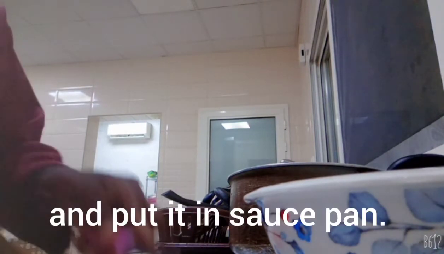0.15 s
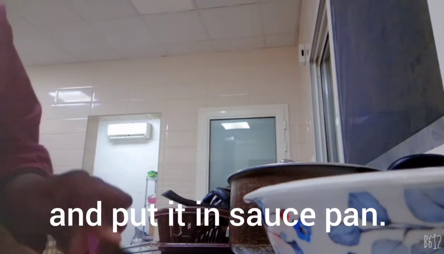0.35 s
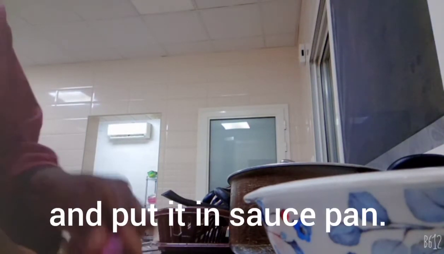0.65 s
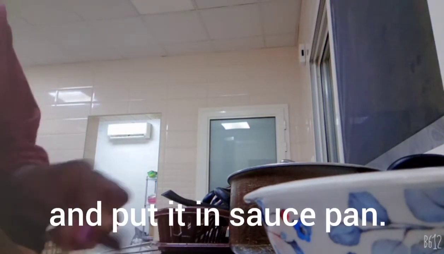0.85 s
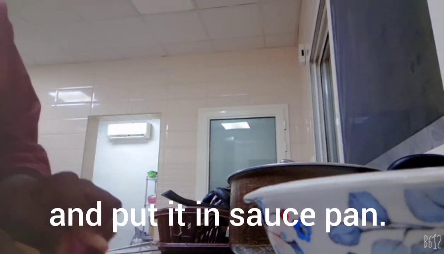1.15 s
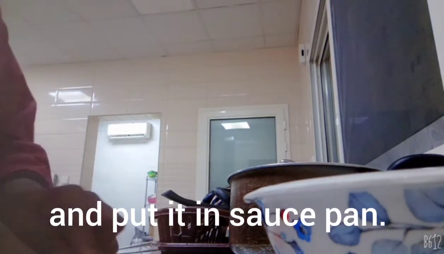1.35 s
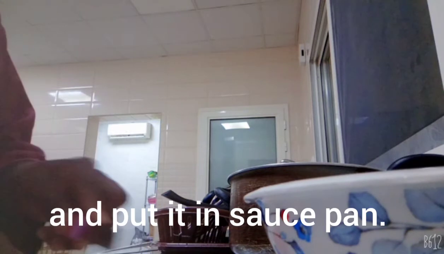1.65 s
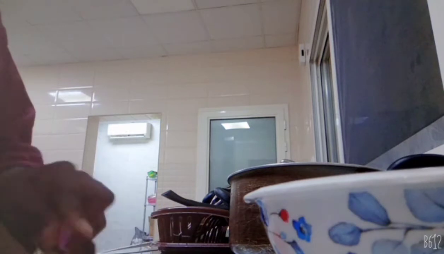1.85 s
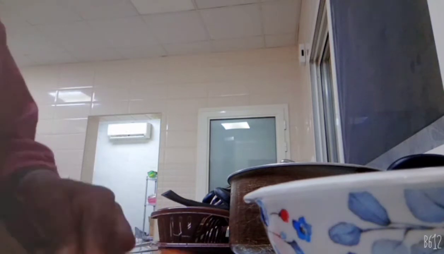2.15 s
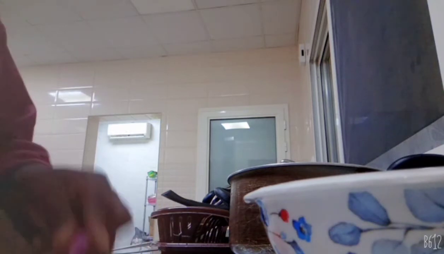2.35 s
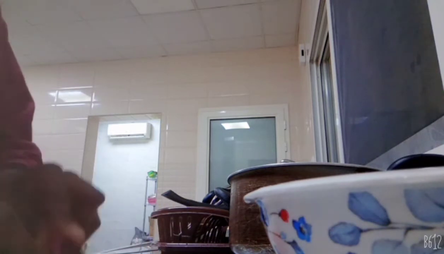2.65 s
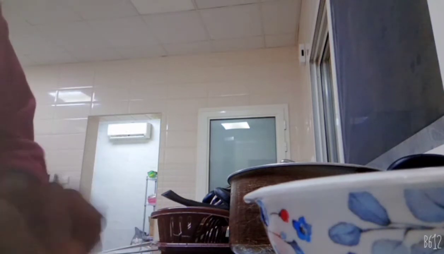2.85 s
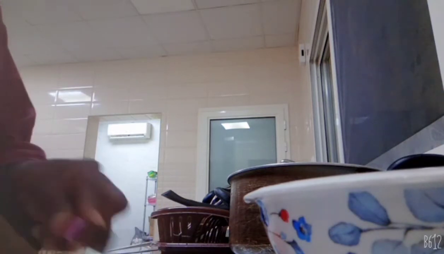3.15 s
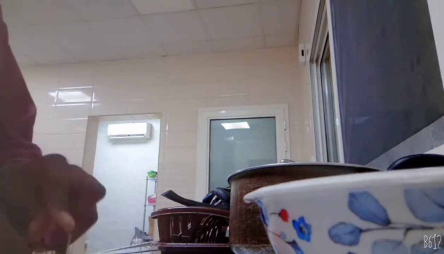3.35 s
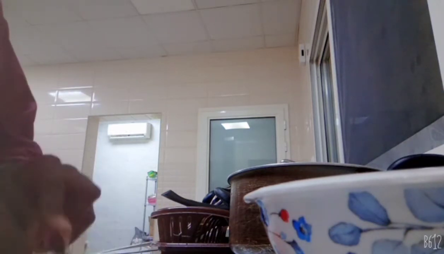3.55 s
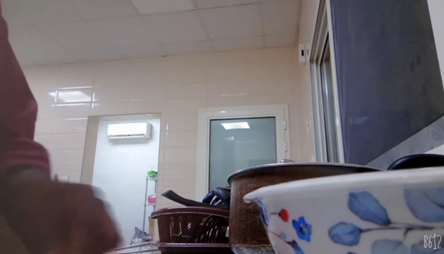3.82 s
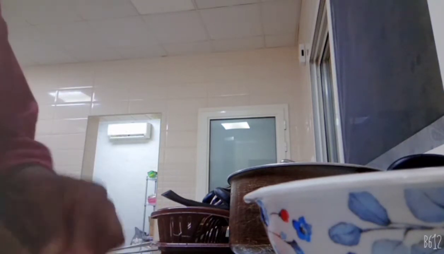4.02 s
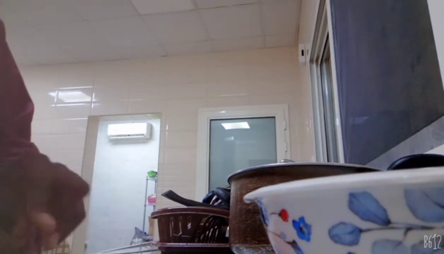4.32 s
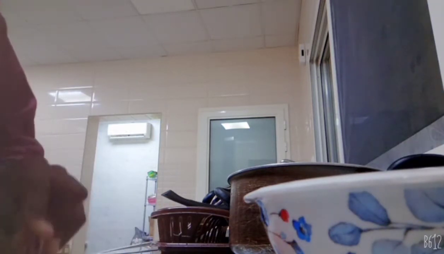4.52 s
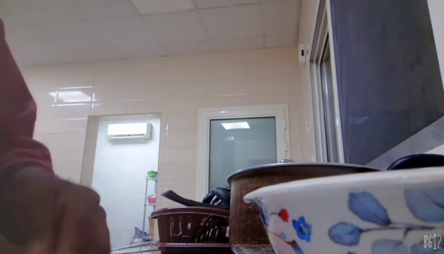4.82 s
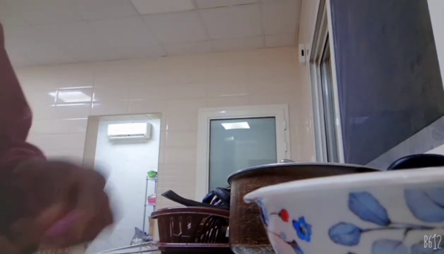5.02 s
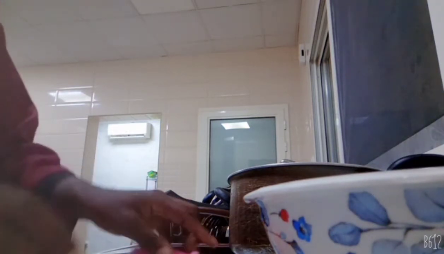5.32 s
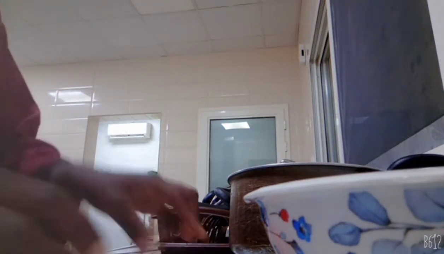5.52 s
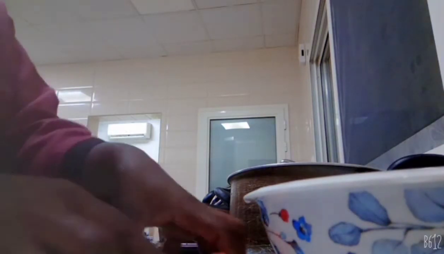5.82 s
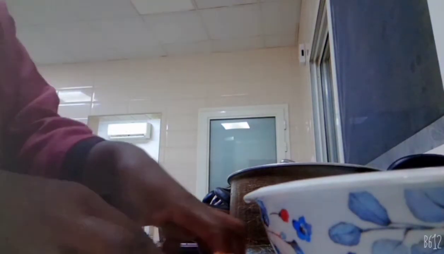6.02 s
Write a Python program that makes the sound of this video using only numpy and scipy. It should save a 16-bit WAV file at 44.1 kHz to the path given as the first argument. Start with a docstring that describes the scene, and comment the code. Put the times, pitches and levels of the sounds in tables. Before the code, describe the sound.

A serrated knife saws and crunches through a carrot six times, each cut ending in a sharp board knock, then the knife is laid down clattering.

```python
"""Slicing a carrot on a kitchen board

A serrated knife slices a carrot on a board, close to a phone that rests on the same counter of a tiled kitchen.
Teeth slip in the skin and fibres crackle, both as coloured noise bursts; the blade knocks the board, which rings
in decaying modes; slices tip over, the knife is laid down and hands rustle. The counter booms into the phone as
resonated noise, and the phone's suppressor pushes the steady room noise down."""
import sys
import numpy as np
from scipy import signal
from scipy.fft import rfft, irfft
from scipy.io import wavfile
from scipy.ndimage import uniform_filter1d

SR = 44100
rng = np.random.default_rng(int(sys.argv[2]) if len(sys.argv) > 2 else 0)


def volts(x):
    """Linear amplitude factor 10**(x/20) for a level x in dB, scalar or array-like."""
    e = np.asarray(x, float) / 20
    return 10 ** e


def transcribe(u):
    """Save the signal u as a 16-bit wav file named by the first command-line argument.

    u: samples, shape (n,) or (channels, n), limited to [-1, 1]; the rate is SR.
    q: integer samples, one column per channel.
    """
    v = np.clip(np.atleast_2d(u).T, -1, 1)
    q = np.round(v * 32767).astype(np.int16)
    wavfile.write(sys.argv[1], SR, q)


N = 272538  # samples

# blade breaking through and landing on the board; levels are relative within each part:
# landing_s, first_crackle_ms, crunch_ms, crunch_db, knock_db, contact_ms, last_fibres_db, thinness (-1 to 1)
CUTS = [(0.2049, 25, 8.7, -18, -15.5, 0.03, -38, 0.15), (1.112, 17, 5.76, -10.5, -12.5, 0.029, -24.5, 0.09),
        (1.8669, 7.3, 9.5, -14.5, -10, 0.021, -22, 0.19), (2.610, 23, 11, -16.5, -8.5, 0.068, -30.5, 0.069),
        (3.568, 6.9, 19, -17, -9.5, 0.14, -31, 0.22), (4.5028, 14, 4.6, -8, -6, 0.11, -30, 0.55)]
# modes of the cutting board: pitch_hz, relative_level_db, t60_s
BOARD = [(620, 3, 0.019), (1792, -8.5, 0.12), (2180, 6.5, 0.027), (2566, 24.5, 0.02), (2900, 20.5, 0.023),
         (4400, 16, 0.013), (5200, 3.5, 0.026)]
# modes of the knife: pitch_hz, relative_level_db, t60_s
KNIFE = [(634, -11.5, 0.1), (730, -10.5, 0.088), (1220, -2.5, 0.034), (1700, 5, 0.033), (1920, 0, 0.045),
         (3170, 11, 0.0064), (4700, 3, 0.01)]
# crisp colour of the root: frequency_hz, gain_db
FIBRE = [(300, -19.5), (600, -17), (1300, -28.5), (2700, -16.5), (3800, -14.5), (4800, -4.5), (6200, 3.5),
         (7400, -12.5), (9000, -24), (13000, -29.5), (14800, -9), (16200, -22.5)]
# what the walls get of a blow on the board: frequency_hz, gain_db
BLOW = [(150, -46), (550, -4), (1200, -16.5), (1900, -6), (2350, 3.5), (3150, 3.5), (3900, -6), (5200, 9),
        (7000, -8), (10000, -49)]
# what the walls get of a tap of the knife, also the dull colour of its dragging: frequency_hz, gain_db
RATTLE = [(300, -8.5), (600, -0.5), (1200, -2), (1900, -4.5), (2500, -8.5), (5000, -3), (9000, -39)]
# bright colour of the knife's scuffs and dragging: frequency_hz, gain_db
SCUFF = [(880, -34), (1500, -5.5), (2680, -9), (4890, -6), (6270, -1.5), (8220, -33), (15100, -45.5),
         (16400, -18.5)]
PRESS_RISE_DB_S, PRESS_FALL_DB_S, RUB_FALL_DB_S = 605, 253, 128.5
RUB_GRIT_DB = 2.6  # unevenness of rubbing noise


def unit(x):
    """Normalization: scales a signal to rms 1."""
    return x / np.sqrt(np.mean(x ** 2))


def colour(x, table):
    """Minimum-phase filtering: a causal filter through (Hz, dB) points, from the cepstrum of the log gain."""
    hz, db = np.transpose(table)
    size = 2048
    bins = np.arange(size // 2 + 1) * SR / size
    cep = irfft(np.log(volts(np.interp(np.log(bins + 1), np.log(hz), db))))
    # folding the cepstrum onto positive times makes the filter causal
    cep[1:size // 2] *= 2
    cep[size // 2 + 1:] = 0
    return signal.fftconvolve(x, irfft(np.exp(rfft(cep))))[:len(x)]


def resonate(x, peaks):
    """Resonance: a sum of band-passes at (Hz, width Hz, dB)."""
    return sum(volts(db) * signal.lfilter(*signal.iirpeak(hz, hz / width, SR), x) for hz, width, db in peaks)


def add(out, s, x):
    """Superposition: mixes a short sound in at time s."""
    i = int(s * SR)
    out[i:i + len(x)] += x[:N - i]


def grit(size, spread_db):
    """Impulsive noise: samples of very uneven sizes, so that clicks stand out."""
    return unit(rng.standard_normal(size) * volts(spread_db * rng.exponential(size=size)))


def clumps(size, ms, spread_db):
    """Random modulation: a gain that holds random levels for about ms, with soft steps."""
    step = max(int(ms * SR / 1000), 1)
    levels = np.repeat(rng.standard_normal(size // 8), step)[:size]
    return volts(spread_db * uniform_filter1d(levels, step // 2 + 1))


def burst(ms, spread_db, rise_ms=0.1):
    """Impulsive noise burst: short and gritty, in small clumps, with a linear rise and a quick fade after ms."""
    t = np.arange(2048) / SR
    rise = np.clip(t * 1000 / rise_ms, 0, 1)
    shape = rise * np.exp(-np.maximum(t - ms / 1000, 0) / .0006)
    x = shape * grit(len(t), spread_db) * clumps(len(t), 2.3, 2.5)
    return x * np.sqrt(np.sum(shape ** 2) / np.sum(x ** 2))


def push(ms):
    """Contact mechanics: a half-sine force of unit impulse; longer contact is duller."""
    force = np.sin(np.pi * np.clip((np.arange(128) + .5) / SR * 1000 / ms, 0, 1))
    return force / force.sum()


def strike(modes, ms):
    """Modal excitation: a push rings the decaying modes, each blow with its own mix, to a peak of 1."""
    t = np.arange(4096) / SR
    hz, db, t60 = np.transpose(modes)[:, :, None]
    level_chance, pitch_chance = rng.standard_normal((len(modes), 2)).T[:, :, None]
    tones = np.sin(2 * np.pi * hz * (1 + 0.045 * pitch_chance) * t)
    ring = np.sum(volts(db + 2.0 * level_chance) * tones * 1000. ** (-t / t60), axis=0)
    out = np.convolve(ring, push(ms))[:len(t)]
    return out / np.abs(out).max()


def thin(x, share):
    """Spectral tilt: takes off a share of the sample before, toward the treble (duller if negative)."""
    share = np.clip(share, -1, 1)
    return signal.lfilter([1, -share], [np.sqrt(1 + share ** 2)], x)


def swells(table, column, rise, fall):
    """Exponential envelopes, power-summed: each row rises, holds its level and falls, in dB per second."""
    t = np.arange(N) / SR
    power = 0
    for row in table:
        start, hold = row[:2]
        db = row[column] - rise * np.maximum(start - t, 0) - fall * np.maximum(t - start - hold, 0)
        power = power + volts(2 * db)
    return np.sqrt(power)


def kitchen():
    """Stationary noise and tones: room noise, appliance hum in narrow bands, and a thin growing whine."""
    # room noise colour: frequency_hz, gain_db
    noise_colour = [(30, 2.5), (235, -2), (419, -1.5), (878, -6.5), (1030, -15.5), (2590, -11),
                    (6020, -19.5), (8050, -26), (15200, -26), (16400, -46)]
    # hum lines: pitch_hz, level_db
    hum_lines = [(100, -76.5), (200, -80.5), (300, -79)]
    # growing whine: time_s, level_db (of its steady tone)
    whine_levels = [(0, -80), (3.0, -77.5), (3.9, -72), (6.18, -72.5)]
    whine_hz, hum_width_hz, noise_db = 507, 4, -71
    hum = 0
    for hz, db in hum_lines:
        hum = hum + volts(db) * unit(resonate(rng.standard_normal(N), [(hz, hum_width_hz, 0)]))
    t = np.arange(N) / SR
    waver = unit(resonate(rng.standard_normal(N), [(whine_hz, 12.0, 0)]))
    tone = np.sqrt(2) * np.sin(2 * np.pi * whine_hz * t)
    whine = volts(np.interp(t, *np.transpose(whine_levels))) * (tone + 0.5 * waver)
    return volts(noise_db) * unit(colour(rng.standard_normal(N), noise_colour)) + hum + whine


def sawing():
    """Stick-slip: each tooth slips in the skin as crisp grit and shakes board, knife and counter."""
    # runs of slipping teeth, shaking relative to the slip: first_slip_s, last_slip_s, teeth (count),
    # last_gap_over_first_gap (ratio), first_db, last_db, board_db, counter_db
    saw_runs = [(0.026, .1531, 6, .92, -47.5, -35.5, -27, -13.5),
                (0.7445, .8984, 8, 1.3, -48, -42.5, -47.5, -8.5),
                (1.635, 1.7644, 7, 1.6, -59.5, -44, -21, -11.5),
                (1.8093, 1.8103, 1, 1, -45.5, -41, -16, -24),
                (2.4109, 2.4488, 3, 1.05, -46, -51, -21.5, -21.5),
                (2.4759, 2.5297, 3, .9, -42, -43.5, -27.5, 7),
                (3.3465, 3.4301, 4, .95, -46.5, -43, -32.5, -12),
                (3.4883, 3.4875, 1, 1, -44.5, -43, -16.5, -22), (4.149, 4.19, 2, 1, -63, -63.5, -7.5, -18),
                (4.24, 4.3066, 3, 1.17, -51, -48.5, -11.5, -20),
                (4.372, 4.4199, 2, 1, -43.5, -36.5, -12.5, -2.5)]
    # counter resonances: pitch_hz, width_hz, gain_db
    counter_modes = [(90, 30, 12.5), (190, 64, 0), (370, 91, -9), (526, 100, 4.5)]
    scatter_db, scatter_ms, thin_scatter = 1.5, 0.6, .3
    bright_db, thin_per_db = -41, .06  # slips softer than this are duller
    slips, on_board, on_counter = np.zeros((3, N))
    for first, last, teeth, stretch, db0, db1, board_db, counter_db in saw_runs:
        steps = np.cumsum(np.r_[0, np.linspace(1, stretch, teeth - 1)])
        times = first + (last - first) * steps / max(steps[-1], 1e-9)
        for s, db in zip(times, np.linspace(db0, db1, teeth)):
            late, loud, share = rng.standard_normal(3)
            s = s + late * scatter_ms / 1000
            slip = volts(db + loud * scatter_db) * burst(4.88, 0.7, rise_ms=0.5)
            share = (db - bright_db) * thin_per_db + thin_scatter * share
            add(slips, s, thin(thin(slip, share), share))
            add(on_board, s, volts(board_db) * slip)
            add(on_counter, s, volts(db + counter_db + 26.5) * push(2.0))
    board, knife = ([(hz, 2.0 / t60, db) for hz, db, t60 in modes] for modes in (BOARD, KNIFE))
    rung = resonate(on_board, board) + volts(-3.5) * resonate(on_board, knife)
    return volts(3.0) * colour(slips, FIBRE) + rung + resonate(on_counter, counter_modes)


def rubbing():
    """Friction noise: blade and hands rub as fine, patchy grit that never quite stops."""
    # strokes: start_s, hold_s, level_db
    rubs = [(.03, 0.17, -62.5), (.88, 0.038, -61), (1.76, 0.079, -57), (2.12, 0.07, -65.5),
            (2.42, 0.38, -65), (3.45, 0.097, -60), (4.39, 0.17, -59), (5.58, 0.11, -62.5),
            (5.75, 0.045, -71), (5.99, .11, -65.5)]
    # rustling colour: frequency_hz, gain_db
    rustle_colour = [(700, -31), (1500, -22.5), (2680, -11.5), (3600, -15), (4890, -4.5), (6270, -2),
                     (8220, -32.5), (15100, -27), (16400, -21)]
    rise_db_s, rest_db = 148.5, -87.5
    rustle = unit(colour(grit(N, RUB_GRIT_DB) * clumps(N, 20, 4.5), rustle_colour))
    return rustle * (swells(rubs, column=2, rise=rise_db_s, fall=RUB_FALL_DB_S) + volts(rest_db))


def pressing():
    """Structure-borne sound: hands and blade press in jolts; counter and board answer at their resonances."""
    # presses: start_s, hold_s, boom_db, thud_db, board_creak_db
    presses = [(.06, 0.15, -63, -64, -72), (.2, 0.088, -81, -66, -55.5), (.37, 0.019, -59.5, -76.5, -74.5),
               (.77, 0.027, -65.5, -81.5, -78.5), (.83, 0.094, -60.5, -68.5, -65.5),
               (1.1, 0.054, -51, -60, -52.5), (1.3, 0.011, -67, -70.5, -58),
               (1.65, 0.14, -82, -71.5, -66.5), (1.72, 0.12, -59, -75, -63), (1.87, 0.018, -78, -72, -53.5),
               (2.02, 0.036, -62, -54, -53), (2.15, 0.021, -60.5, -56.5, -52.5),
               (2.485, 0.076, -55.5, -59.5, -59), (2.61, 0.04, -53.5, -76, -48.5),
               (2.78, 0.011, -56, -69.5, -55.5), (3.4, .17, -55, -66.5, -62),
               (3.57, 0.033, -71.5, -65.5, -56.5), (3.74, 0.022, -53.5, -69, -58.5),
               (4.37, 0.051, -53, -67, -56), (4.5, 0.055, -47, -57, -53),
               (4.74, 0.026, -69.5, -62.5, -62.5), (5.22, 0.15, -58.5, -60, -64.5),
               (6.0, 0.045, -74, -66.5, -62.5)]
    # counter boom: pitch_hz, width_hz, relative_level_db
    boom_modes = [(88.2, 2.9, 9), (60, 2.7, -2)]
    # counter thud: pitch_hz, width_hz, relative_level_db
    thud_modes = [(189, 40, 0)]
    # board creak: pitch_hz, width_hz, relative_level_db
    creak_modes = [(412, 32, 5.5), (512.5, 100, 9)]
    lumps = clumps(N, 14, 4)
    boom = unit(resonate(rng.standard_normal(N), boom_modes) * lumps)
    thud = unit(resonate(rng.standard_normal(N) * lumps, thud_modes))
    creak = unit(resonate(resonate(grit(N, 1.8) * lumps, creak_modes), [(530, 220, 0)]))
    boom = boom * swells(presses, column=2, rise=PRESS_RISE_DB_S, fall=PRESS_FALL_DB_S)
    thud = thud * swells(presses, column=3, rise=PRESS_RISE_DB_S, fall=PRESS_FALL_DB_S)
    creak = creak * swells(presses, column=4, rise=PRESS_RISE_DB_S, fall=132.5)
    return boom + thud + creak


def breaking():
    """Brittle fracture: fibres crackle, crunch and part around each landing, with single crackles and ticks."""
    # single crackles and ticks, before landings, from a slipping tooth, and as slices tear:
    # time_s, length_ms, relative_level_db, thinness (-1 to 1)
    ticks = [(0.197, .5, -8.5, 0), (.328, 1.8, -33, 0.66), (0.3434, 1.8, -15.5, 0.73), (0.344, 9.7, -26, 1),
             (1.2616, 0.41, -5.5, 0.96), (1.269, 1.9, -23.5, .3), (1.279, 1.7, -11.5, .3),
             (1.2871, 0.7, -9.5, 1), (1.3185, 0.26, -17.5, 1), (1.35, 0.84, -21, 1),
             (1.8348, 11, -25.5, 0.38), (2.015, 0.59, -13, 0.16), (2.02, 2.5, -15.5, .3),
             (2.7612, 2.5, -14.5, 0.45), (2.7641, 1.5, -21, 0), (3.294, 1.4, -52, 0),
             (3.532, 5.3, -31, 0.028), (3.708, 0.5, -12.5, .3), (3.7155, 1.1, -19.5, 0.39),
             (3.717, 4.4, -16.5, 0.16), (3.85, 8.7, -41.5, 0.087), (4.618, 0.83, -12, 0.049),
             (4.631, 6.3, -24, .3), (4.641, 3.9, -24.5, 0.62)]
    lead_db, lead_grow_db_ms = -9.5, 0.27  # the first crackle grows to this far under the crunch
    after_gap_ms, after_ms = 9.2, 6  # last fibres part just after the landing
    crunch_grit_db = 2.2
    cracks = np.zeros(N)
    t_ms = np.arange(2048) * 1000 / SR
    for s, lead, ms, db, _, _, after_db, share in CUTS:
        growth = volts(db + lead_db - lead_grow_db_ms * np.maximum(lead - t_ms, 0))
        crackle = growth * burst(lead, crunch_grit_db, rise_ms=6.8)
        crunch = volts(db) * burst(ms, crunch_grit_db, rise_ms=ms / 2)
        add(cracks, s - (ms + lead) / 1000, thin(thin(crackle, share), share))
        add(cracks, s - ms / 1000, thin(thin(crunch, share), share))
        add(cracks, s + after_gap_ms / 1000, volts(after_db) * burst(after_ms, 4.3))
    for s, ms, db, share in ticks:
        add(cracks, s, thin(volts(db) * burst(ms, 1.5), share))
    return volts(3.0) * colour(cracks, FIBRE)


def landings():
    """Impact: the blade lands and rings the board; summed over directions the modes blur toward the walls."""
    near, far = np.zeros((2, N))
    for s, _, _, _, db, ms, _, _ in CUTS:
        add(near, s, volts(db) * strike(BOARD, ms))
        add(far, s, volts(db + 21.0) * push(ms))
    far = colour(far, BLOW)
    return near + volts(-15.5) * far, far  # the blur is also heard directly, as one solid crack


def touches():
    """Skidding contact: a light touch of the blade excites the board's modes through a gritty burst."""
    # touches on the board: time_s, level_db, contact_ms
    knocks = [(0.344, -36.5, .3), (1.289, -22.5, 0.096), (2.0223, -18, 0.32), (2.149, -35.5, 0.92),
              (2.862, -38, .6), (2.905, -40.5, 0.99), (3.722, -43.5, .67), (4.632, -34, 0.2),
              (4.64, -31.5, 0.11), (4.754, -45, 0.88)]
    skid_ms = 12  # per ms of contact
    near, far = np.zeros((2, N))
    for s, db, ms in knocks:
        skid = np.convolve(strike(BOARD, ms), burst(skid_ms * ms, 1.8))
        add(near, s, volts(db) * skid / np.abs(skid).max())
        add(far, s, volts(db + 19.0) * push(ms))
    return near, colour(far, BLOW)


def tipping():
    """Damped resonance: slices tip over as clumpy grit through one broad resonance, twice."""
    # tocks: time_s, pitch_hz, relative_level_db
    tocks = [(0.499, 1700, -47.5), (2.865, 1140, -42), (3.845, 1598, -31), (4.636, 1800, -28)]
    near = np.zeros(N)
    for s, hz, db in tocks:
        grain = volts(db) * burst(14, 6.0) * clumps(2048, 4, 6)
        add(near, s, resonate(resonate(grain, [(hz, 800, 0)]), [(hz, 800, 0)]))
    return near


def clatter():
    """Repeated impact: the knife rocks to rest; each tap rings it and chatters in three uneven rebounds."""
    # taps of the knife: time_s, level_db, contact_ms, scuff_db (relative to the tap)
    knife_taps = [(5.158, -34.5, 0.053, 8.5), (5.185, -31.5, 0.21, 3.5), (5.218, -32, 0.83, -13.5),
                  (5.229, -38, 0.16, -10.5), (5.247, -41, 0.33, -10.5), (5.259, -36, 0.11, -13),
                  (5.266, -40, 0.3, -19), (5.277, -26, .4, -19.5), (5.2921, -35, 0.039, 3.5),
                  (5.303, -34, 0.43, -17), (5.324, -31, 0.4, -20), (5.3353, -23.5, 0.3, -8),
                  (6.011, -41, 0.64, -24.5)]
    chatter_ms, chatter_db = 3.3, -10  # mean gap and level step of the rebounds
    near, taps, scuffs = np.zeros((3, N))
    for s, db, ms, scuff_db in knife_taps:
        add(taps, s, volts(db + 21.5) * push(ms))
        add(scuffs, s, volts(db + scuff_db) * burst(5.5, 2.0))
        late = np.cumsum(np.r_[0, chatter_ms / 1000 * rng.uniform(.4, 1.6, size=3)])
        for k, after in enumerate(late):
            add(near, s + after, volts(db + k * chatter_db) * strike(KNIFE, ms))
    far = colour(taps, RATTLE)
    return near + volts(-19) * far, far, colour(scuffs, SCUFF)


def scraping():
    """Sliding friction: the knife is dragged a little, as a dull and a bright layer of grit."""
    # drags: start_s, hold_s, dull_db, bright_db
    scrapes = [(5.17, 0.19, -61, -60.5), (5.94, 0.053, -68, -67.5)]
    dull = unit(colour(grit(N, RUB_GRIT_DB), RATTLE))
    bright = unit(colour(grit(N, RUB_GRIT_DB) * clumps(N, 9.8, 7.6), SCUFF))
    dull = dull * swells(scrapes, column=2, rise=PRESS_RISE_DB_S, fall=PRESS_FALL_DB_S)
    return dull + bright * swells(scrapes, column=3, rise=PRESS_RISE_DB_S, fall=RUB_FALL_DB_S)


def room(x):
    """Reverberation: early reflections off counter and bowls, far walls, a diffuse tail fading band by band."""
    # tiled room: frequency_hz, t60_s, relative_level_db
    room_decay = [(245, 0.56, -11.5), (534, 0.65, -12), (1400, 0.92, -16), (1800, 1.038, -12),
                  (3340, 0.88, -14.5), (4830, 0.75, -19), (5950, 0.68, -24.5), (8050, 0.43, -24),
                  (15000, 0.098, -12)]
    # far walls, within the tail: delay_s, gain_db
    wall_echoes = [(0.035, -28.5), (0.057, -33)]
    hz, t, z = signal.stft(rng.standard_normal(int(1.3 * SR)), SR, nperseg=256)
    at, t60, db = np.transpose(room_decay)
    t60, db = (np.interp(np.log(hz + 1), np.log(at), c)[:, None] for c in (t60, db))
    tail = signal.istft(z * volts(db - 60 * t / t60), SR, nperseg=256)[1]
    t = np.arange(len(tail)) / SR
    rise = volts(-24.0) * (1 - np.exp(-(t / 0.03) ** 2))  # the tail builds up in about 30 ms
    walls = sum(volts(db) * np.exp(-((t - s) / 0.00087) ** 2) for s, db in wall_echoes)
    early = volts(-34.5) * rng.standard_normal(len(t)) * np.exp(-t / 0.0089)
    return signal.fftconvolve(x, tail * (rise + walls) + early)


def room_in_stretches(x):
    """Reverberation in overlapping stretches, each with a freshly drawn random tail."""
    hop = int(.3 * SR)
    x, out = np.r_[np.zeros(hop), x, np.zeros(2 * hop)], np.zeros(N + 4 * SR)
    fade = np.sin(np.pi * np.arange(2 * hop) / (2 * hop))
    for i in range(0, N + hop, hop):
        wet = room(fade * x[i:i + 2 * hop])
        out[i:i + len(wet)] += wet
    return out[hop:hop + N]


def scene():
    """Superposition: near sounds, their room, and what comes through the counter."""
    landing, landing_far = landings()
    touch, touch_far = touches()
    tap, tap_far, scuffs = clatter()
    # small hard things give off no bass
    high_pass = signal.butter(4, 380, "high", fs=SR, output="sos")
    knock = signal.sosfilt(high_pass, landing + touch + tipping() + tap)
    crisp = sawing() + breaking() + scuffs + rubbing() + scraping()
    reverberant = room_in_stretches(crisp + landing_far + touch_far + tap_far)
    return (knock + crisp + reverberant + pressing() + kitchen())[None]


def suppress(x, over_db, depth_db, hold):
    """Spectral gating: each band is turned down as its level nears the quiet level seen in it."""
    z = signal.stft(x, nperseg=512)[2]
    power = uniform_filter1d(np.abs(z) ** 2, size=3, axis=0)
    # instant rise, slow release
    power = np.maximum(power, signal.lfilter([1 - hold], [1, -hold], power, axis=1))
    quiet = np.percentile(power, 10, axis=1)[:, None] * volts(2 * over_db)
    gain = np.maximum(power / (power + quiet), volts(depth_db))
    return signal.istft(z * gain, nperseg=512)[1][:N]


def low_pass(x):
    """Removes everything above the highest recorded frequency."""
    return signal.sosfilt(signal.butter(12, 16960, fs=SR, output="sos"), x)


def record(dry):
    """Band limiting: the phone's noise suppressor, then bass and top cut."""
    x = suppress(dry[0], over_db=4.2, depth_db=-9.0, hold=.8)
    x = signal.sosfilt(signal.butter(3, 55, "high", fs=SR, output="sos"), x)
    x = signal.sosfilt(signal.ellip(6, .2, 30, 16000, fs=SR, output="sos"), x)
    return low_pass(x[None])


dry = scene()
out = record(dry)
transcribe(out)
```